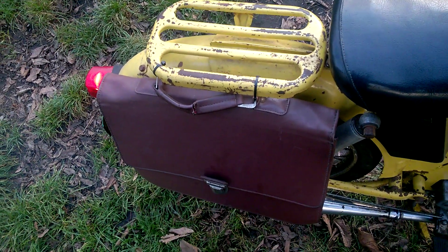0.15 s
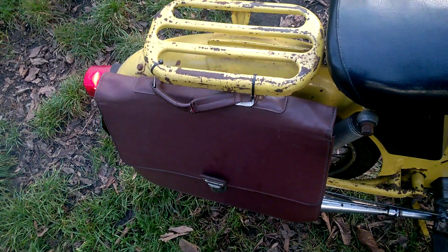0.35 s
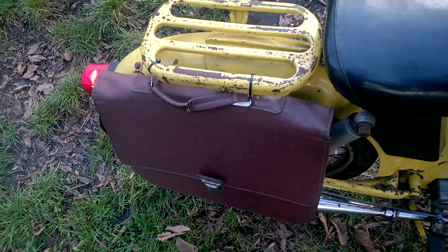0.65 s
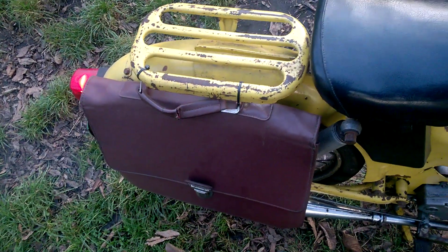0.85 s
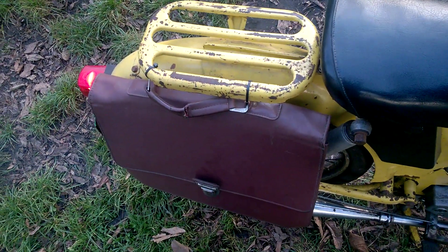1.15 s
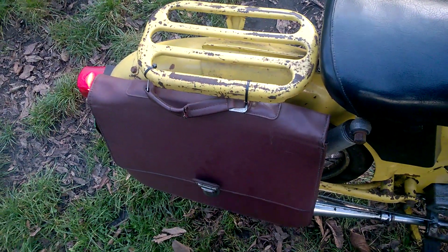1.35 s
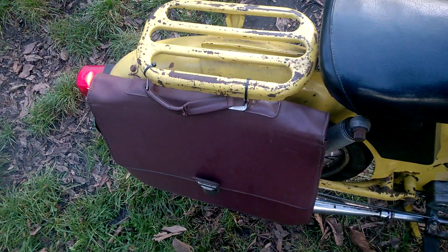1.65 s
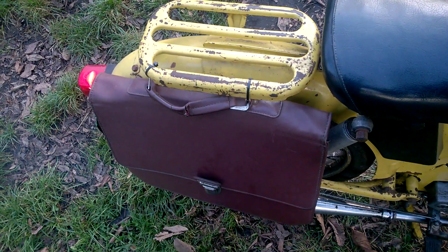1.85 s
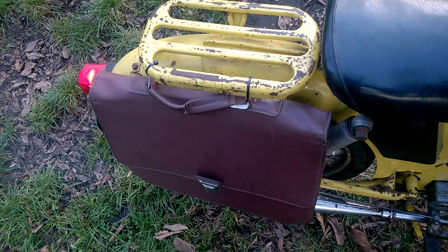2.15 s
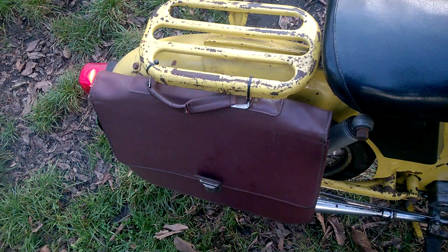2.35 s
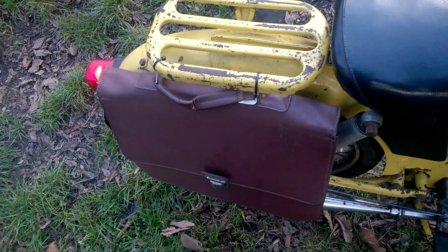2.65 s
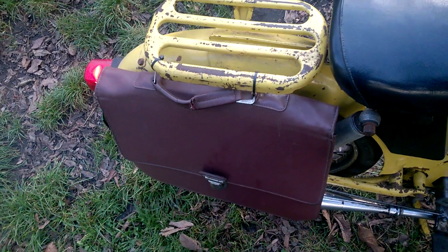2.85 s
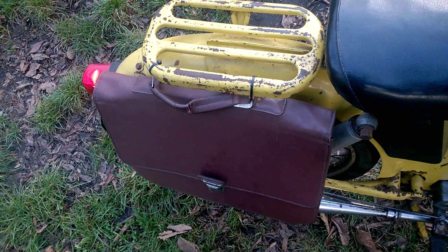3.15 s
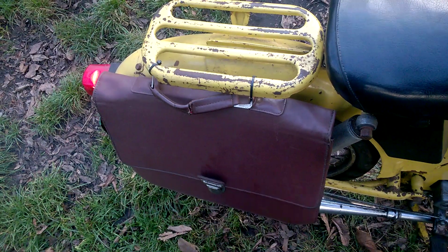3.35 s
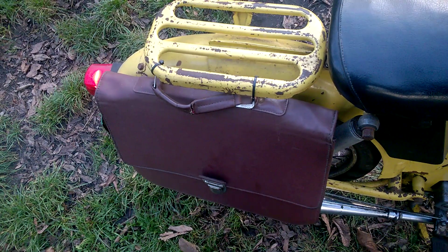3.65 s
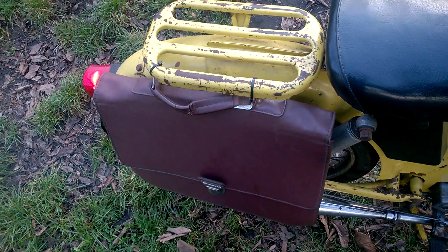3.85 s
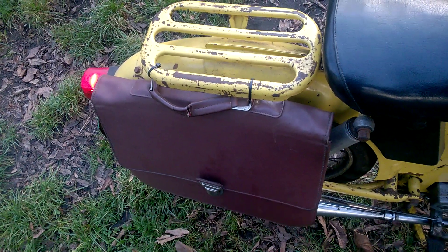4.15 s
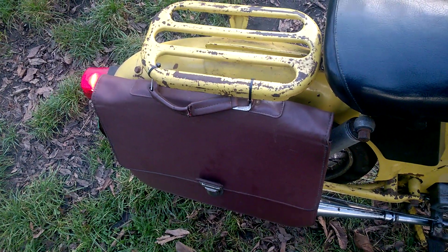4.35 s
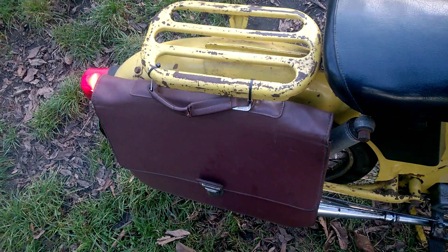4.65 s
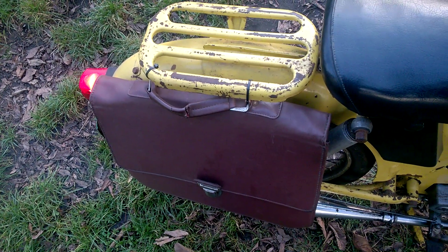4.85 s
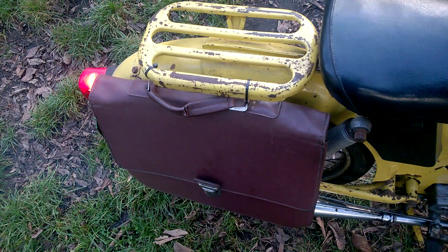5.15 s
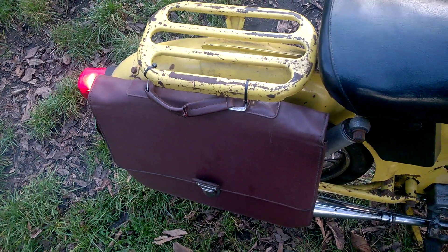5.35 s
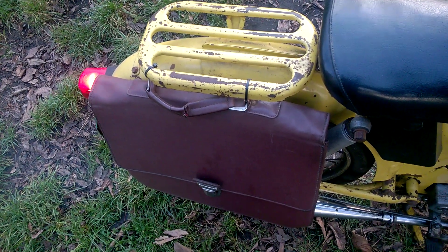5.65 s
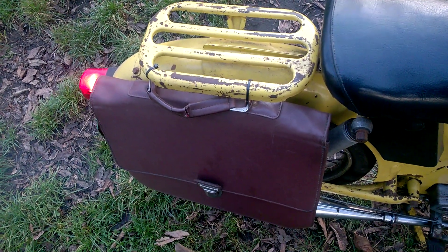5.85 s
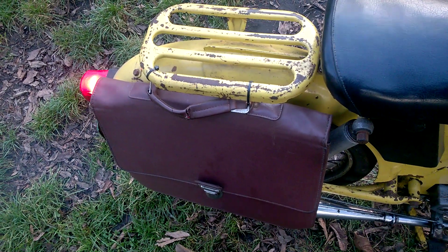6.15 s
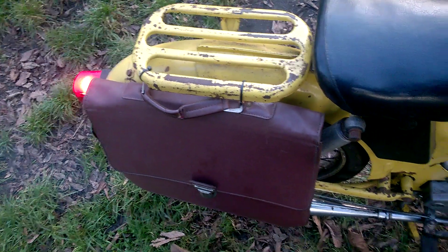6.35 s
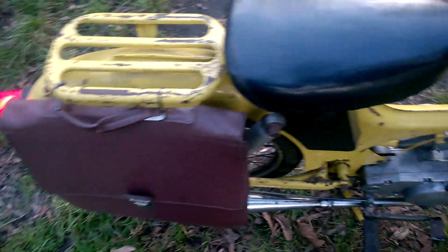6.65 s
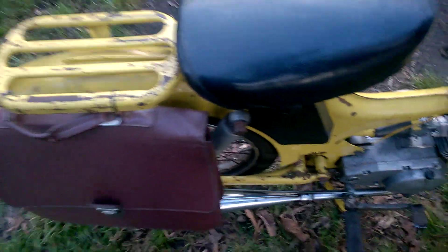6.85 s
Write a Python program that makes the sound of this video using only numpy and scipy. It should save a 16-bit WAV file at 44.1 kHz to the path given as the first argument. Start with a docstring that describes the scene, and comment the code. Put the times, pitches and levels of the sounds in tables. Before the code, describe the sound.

A small moped two-stroke idles close by in the open air: irregular bursts of two or three low pops with coasting putters between, over metallic ticking and chain rattle. At about four seconds the throttle opens, the gaps close into an even buzz and pitch climbs for over two seconds. Just after six and a half it is eased, faltering and rasping, as the microphone swings nearer the cylinder. Dry, no echo.

```python
"""A small two-stroke moped stutters at idle: bursts of one to three firings, coasting revolutions between.
From 4 s the throttle opens and every revolution fires; the speed climbs, with brief stutters near the top,
and the throttle is eased at 6.5 s. Gas pulses ring exhaust and air box, shaped noise makes the gas rush,
and knocks at set crank angles ring the cylinder fins and rasp."""
import sys
import numpy as np
from scipy import signal
from scipy.fft import rfft, irfft, next_fast_len
from scipy.io import wavfile
from scipy.ndimage import uniform_filter1d

SR = 44100
rng = np.random.default_rng(int(sys.argv[2]) if len(sys.argv) > 2 else 0)


def store_pcm(level_fs):
    """Save levels as 16-bit WAV."""
    pcm = np.round(np.clip(level_fs, -1, 1) * 32767).astype(np.int16)
    wavfile.write(sys.argv[1], SR, np.atleast_2d(pcm).T)


N = 308682
TIME = np.arange(N) / SR

# crankshaft speed before the kick of each burst: t/s, speed/(rev/s)
SPEED = [(0.0, 41.7), (0.62, 42.1), (0.8, 41.5), (1.15, 43.0), (3.16, 42.1), (3.68, 43.4), (3.84, 42.1),
         (4.05, 44.0), (4.15, 47.1), (4.25, 48.96), (4.45, 51.42), (4.7, 55.0), (4.9, 57.28), (5.15, 59.21),
         (5.45, 59.92), (5.66, 60.23), (5.74, 60.03), (5.85, 62.19), (6.1, 65.82), (6.35, 69.56),
         (6.52, 70.47), (6.62, 68.29), (6.8, 66.55), (7.0, 63.44)]
# bursts of firing at idle: t/s of first firing, firings/1, strength/dB
BURSTS = [(0.052, 2.0, 0.5), (0.218, 2.0, -0.5), (0.361, 3.0, -1.5), (0.548, 3.0, -1.4), (0.713, 3.0, -0.7),
          (0.879, 2.0, -1.0), (1.021, 3.0, -0.7), (1.162, 2.0, 0.0), (1.3, 3.0, -1.0), (1.509, 2.0, 1.0),
          (1.672, 3.0, 0.2), (1.856, 2.0, -0.5), (2.045, 2.0, -1.0), (2.139, 3.0, -2.4), (2.304, 3.0, 0.3),
          (2.468, 3.0, -1.5), (2.633, 3.0, -1.7), (2.797, 2.0, -0.4), (2.915, 3.0, -0.3), (3.08, 2.0, -1.2),
          (3.222, 1.0, -1.3), (3.27, 2.0, -4.5), (3.339, 3.0, -1.0), (3.526, 1.0, 0.4), (3.641, 3.0, -0.6),
          (3.804, 3.0, -0.4), (3.987, 3.0, 0.4), (4.121, 2.0, 0.6), (4.248, 2.0, 0.0)]
# noise colour of metal rasp: f/Hz, density/(dB per Hz), relative
CLATTER_SPECTRUM = [(1100, -3.5), (1300, -1), (1600, -11), (1850, -4), (2500, -9.5), (3100, -10.5),
                    (3550, -15.5), (4200, -12.5), (4600, -22.5), (5500, -26), (6200, -31.5), (7000, -38.5),
                    (7600, -55)]
# noise colour of fine hiss: f/Hz, density/(dB per Hz), relative
HISS_SPECTRUM = [(6000, -10), (7500, 0), (8200, 2), (9000, -4), (9700, -3), (10000, 4), (10400, -5),
                 (11000, 3), (11500, -4), (12150, 6), (12900, -4), (15700, -8)]
# noise colour of the opening exhaust port, also of knock thuds: f/Hz, density/(dB per Hz), relative
CRACK_SPECTRUM = [(300, -18), (520, 5.5), (750, 10), (1150, -6), (1450, -24.5), (2000, -19), (3000, -27.5),
                  (4200, -21.5), (6000, -38)]

# throttle opens and is held, then is eased, which takes a share of the load
OPEN_AT_S, OPENING_S = 4.07, 0.38
EASE_AT_S, EASING_S, EASE_SHARE = 6.51, 0.069, 0.26
STUTTER_EDGE_S = .024
# strokes grow harder with acceleration above the usual
PULL_DB_PER_REV_S2, USUAL_GAIN_REV_S2 = 0.1566, 6.8
# hotter gas raises the exhaust resonances; they sag when firing stops
HEAT_LAG_S, HEAT_SHIFT, USUAL_HEAT = 0.13, 0.04, 0.97
# tailpipe throb: level without load, gain at full load, extra near the muffler's own note
THROB_DB, THROB_LOAD_DB = -27, 5.5
BOOM_DB, BOOM_HZ, BOOM_WIDTH_HZ = 7.5, 66.3, 14.6
# muffler chamber: note, murmur at full load, boom per share of load lost
CHAMBER_HZ, CHAMBER_DB, CHAMBER_STUTTER_DB = 139.5, -36.5, -18.5
# gas raggedness under full load, as a share of an idle firing
LOADED_RAGGEDNESS = .42
# mechanical gains at idle speed, and rise per extra rev/s
IDLE_REV_S = 42.5
CLATTER_DB, CLATTER_RISE_DB = -39, 0.2385
HISS_DB, HISS_RISE_DB = -79, 0.5
# microphone swings towards the cylinder; the hiss is beamed, so it gains more
APPROACH_AT_S, APPROACH_S = 6.51, 0.27
APPROACH_DB, HISS_APPROACH_DB = 1.5, 5.5
SLAP_AT_S, SLAP_GROWTH_S, SLAP_ANGLE_TURNS, SLAP_DB = 5.7, 1.0, .2, -32
CUTOFF_HZ = 15700


def from_db(db):
    """Decibels to gain."""
    return 10 ** (np.asarray(db) / 20)


def rms_one(x):
    """Scale to unit power."""
    return x / np.sqrt(np.mean(x ** 2) + 1e-20)


def in_time(rows):
    """Each column of a curve, sample by sample."""
    s, *columns = np.transpose(rows)
    return [np.interp(TIME, s, c) for c in columns]


def ramp(start_s, length_s):
    """A steady move from 0 to 1."""
    return np.clip((TIME - start_s) / length_s, 0, 1)


def noise(spectrum):
    """Unit-power noise of a given colour, cut off outside its ends."""
    hz, db = np.transpose(spectrum)
    size = next_fast_len(N, real=True)
    log_hz = np.log(np.maximum(np.fft.rfftfreq(size, 1 / SR), 1))
    gain = from_db(np.interp(log_hz, np.log(hz), db, left=-200, right=-200))
    white = rng.standard_normal(size)
    return rms_one(irfft(rfft(white) * gain, size)[:N])


def clicks(at, sizes):
    """Impulses at the given samples."""
    return np.bincount(np.clip(at, 0, N - 1), sizes, N) + 1e-18


def ring(push, hz, width_hz):
    """Two-pole resonance: a unit click starts a decaying sine of height 1."""
    r, w = np.exp(-np.pi * width_hz / SR), 2 * np.pi * hz / SR
    return signal.lfilter([0, np.sin(w)], [1, -2 * r * np.cos(w), r * r], push)


def fade(push, decay_s, rise_s=0.0017):
    """Each click becomes an envelope that swells quickly and dies away."""
    r = np.exp(-1 / (rise_s * SR))
    swell = signal.lfilter([(1 - r) ** 2], [1, -2 * r, r * r], push)
    return signal.lfilter([1], [1, -np.exp(-1 / (decay_s * SR))], swell)


def scatter(count, spread_db):
    """Random gains: strokes differ in strength."""
    return from_db(spread_db * rng.standard_normal(size=512)[:count])


def crank(surge=.033, surge_s=.042, lag_s=.018):
    """Crank angle in turns: sags before each burst, is kicked on by it, and is whole when a burst begins."""
    starts = np.array(BURSTS)[:, 0]
    coarse = TIME[::50]
    since = (coarse[:, None] - starts - lag_s) / surge_s
    kick = np.interp(TIME, coarse, (since * np.exp(-since ** 2 / 2)).sum(1))
    turns = np.cumsum(in_time(SPEED)[0] * (1 + surge * kick)) / SR
    ahead = np.unwrap(np.interp(starts, TIME, turns), period=1)
    return turns - np.interp(TIME, starts, ahead)


def passing(turns, angle, jitter_s):
    """The sample at which each revolution passes a crank angle in turns."""
    revs = np.arange(np.ceil(turns[0]), np.floor(turns[-1]) + 1)
    jitter = jitter_s * rng.standard_normal(size=512)[:len(revs)]
    s = np.interp(revs + angle, turns, TIME) + jitter
    return np.clip(np.round(s * SR).astype(int), 0, N - 1)


def idle_burn(at, lead_in=0.6, trail=0.057):
    """Firing strength per revolution at idle; weak firings lead into each burst and another trails it."""
    burn = np.zeros(len(at))
    for s, firings, db in BURSTS:
        k = np.arange(len(at)) - np.argmin(abs(at / SR - s))
        n = round(firings)
        full = (k >= 0) & (k < n)
        shape = full + lead_in * ((k == -1) + .5 * (k == -2)) + trail * (k == n)
        burn = np.maximum(burn, from_db(db) * shape)
    return burn


def stutter():
    """Share of the load lost in each brief stutter, with sloped edges."""
    # t/s, length/s, share of load lost/1
    dropouts = [(5.67, .05, .45), (6.535, .075, .65), (6.69, .08, .65), (6.83, .065, .38), (6.985, .05, .5)]
    lost_share = 0
    for s, length_s, lost in dropouts:
        start_s = s - STUTTER_EDGE_S / 2
        gate = ramp(start_s, STUTTER_EDGE_S) - ramp(start_s + length_s, STUTTER_EDGE_S)
        lost_share = lost_share + lost * gate
    return lost_share


def gaining():
    """Smoothed acceleration of the crank in rev/s^2, never negative."""
    slope = np.gradient(in_time(SPEED)[0]) * SR
    return np.maximum(uniform_filter1d(slope, size=SR // 8), 0)


def engine_load():
    """Burning charge, 0-1: rises as the throttle opens, falls as it is eased and in each stutter."""
    eased = 1 - EASE_SHARE * ramp(EASE_AT_S, EASING_S)
    return np.clip(ramp(OPEN_AT_S, OPENING_S) * eased * (1 - stutter()), 0, 1)


def gas_tuning(at, burn, load):
    """Factor on the exhaust resonances: burning heats the gas with a lag, and heat raises them."""
    r = np.exp(-1 / (HEAT_LAG_S * SR))
    burning = np.interp(np.arange(N), at, np.maximum(burn, load))
    heat = signal.lfilter([1 - r], [1, -r], burning)
    return 1 + HEAT_SHIFT * (heat - USUAL_HEAT)


def pipe(modes, at, burn, spread_db, tuning=1, boom_power=0.73, mixture_db=0.92):
    """One gas pulse a revolution rings the resonances; its colour changes with the throttle."""
    opened, eased = ramp(OPEN_AT_S, OPENING_S)[at], ramp(EASE_AT_S, EASING_S)[at]
    coast, firing = np.clip(1 - burn, 0, 1), 1 - stutter()[at]
    pull = from_db(PULL_DB_PER_REV_S2 * (gaining()[at] - USUAL_GAIN_REV_S2))
    # the mixture varies, so runs of strokes grow stronger and weaker together
    mixture = from_db(mixture_db * noise([(3, 0.0078), (16, 0.019)])[at])
    # ring on a warped clock, faster as the tuning rises, then map back to time
    clock = np.cumsum(tuning * np.ones(N))
    pulse_at, size_out = clock[at].astype(int), int(clock[-1]) + 1
    out = 0
    for k, (hz, width_hz, coast_db, burst_db, load_db, eased_db) in enumerate(modes):
        # deep modes follow burn less steeply; a stutter robs the upper ones
        fired = burn ** (boom_power if hz < 180 else 1)
        idling = coast * from_db(coast_db) + fired * from_db(burst_db)
        running = (1 - eased) * from_db(load_db) + eased * from_db(eased_db)
        running = running * (firing if hz > 450 else 1)
        stroke = (1 - opened) * idling + opened * pull * running
        size = stroke * mixture * scatter(len(at), spread_db)
        push = np.bincount(pulse_at, size, size_out) + 1e-18
        out = out + (-1) ** k * ring(push, hz, width_hz)
    return np.interp(clock, np.arange(len(out)), out)


def throb_level(speed, load):
    """Throb in dB: swells with load, most near the muffler's own note."""
    in_tune = 1 / (1 + (2 * (speed - BOOM_HZ) / BOOM_WIDTH_HZ) ** 2)
    return THROB_DB + load * (THROB_LOAD_DB + BOOM_DB * in_tune)


def tailpipe(turns):
    """Pumped gas throbs once a revolution; the muffler chamber murmurs under load and booms in each stutter."""
    speed, load = in_time(SPEED)[0], engine_load()
    # at higher speeds the gas leaves the muffler later in the revolution
    delay_turns = np.interp(speed, [45, 52, 64, 70], [.02, .14, .22, .32])
    throb = from_db(throb_level(speed, load)) * np.sin(2 * np.pi * (turns - delay_turns))
    chamber = rms_one(ring(rng.standard_normal(N), CHAMBER_HZ, 22))
    murmur = from_db(CHAMBER_DB) * load * chamber
    boom = from_db(CHAMBER_STUTTER_DB) * stutter() * np.sin(2 * np.pi * CHAMBER_HZ * TIME)
    return np.sqrt(2) * (throb + boom) + murmur


def carburettor(inlet_at):
    """Air sucked past the closing throttle slide honks unevenly."""
    # throat resonances: f/Hz, width/Hz, level/dB
    throat_modes = [(685, 25, -29), (1190, 45, -28)]
    closed = ramp(EASE_AT_S, EASING_S)[inlet_at]
    out = 0
    for hz, width_hz, db in throat_modes:
        size = closed * from_db(db) * scatter(len(inlet_at), 3)
        out = out + ring(clicks(inlet_at, size), hz, width_hz)
    return out


def gas_rush(at, burn, load, puff_db=-24.5, steady_db=-43, coast_share=0.32):
    """Turbulence: a short port crack and a longer puff each stroke, raggedest at idle, over a steady rush."""
    # noise colour of the rush: f/Hz, density/(dB per Hz), relative
    gas_spectrum = [(40, -15.5), (90, -3.5), (250, -13), (400, -8.5), (700, -14), (1150, -13), (1450, -27),
                    (2500, -35.5)]
    raggedness = (coast_share + burn) * (1 - load) + LOADED_RAGGEDNESS * load
    blows = clicks(at, raggedness * scatter(len(at), .8))
    crack = from_db(-26) * fade(blows, decay_s=.0022, rise_s=.0004) * noise(CRACK_SPECTRUM)
    puffs = fade(blows, decay_s=.014)
    return crack + noise(gas_spectrum) * (from_db(puff_db) * puffs + from_db(steady_db))


def mechanical_levels():
    """Clatter and hiss gains in dB: both grow with speed and as the microphone comes closer."""
    extra_speed = in_time(SPEED)[0] - IDLE_REV_S
    closer = ramp(APPROACH_AT_S, APPROACH_S)
    return (CLATTER_DB + CLATTER_RISE_DB * extra_speed + APPROACH_DB * closer,
            HISS_DB + HISS_RISE_DB * extra_speed + HISS_APPROACH_DB * closer)


def fins(hits):
    """Cylinder fins and casings ring after each contact."""
    # resonances: f/Hz, width/Hz, relative level/dB
    fin_modes = [(1550, 50, -6), (1850, 80, -1), (2080, 65, 0), (2500, 90, -1), (3005, 55, -5),
                 (3260, 55, -10), (3915, 65, -13), (4215, 70, -8), (5360, 40, -20)]
    return sum((-1) ** k * from_db(db) * ring(hits, hz, width_hz)
               for k, (hz, width_hz, db) in enumerate(fin_modes))


def clatter(turns, burn, ring_db=-9.5, rasp_db=-2.5):
    """Piston, bearings and chain knock at set crank angles: fins ring, a short rasp and grainy sizzle follow."""
    # contacts per revolution: angle/turns, relative level/dB when coasting, in an idle burst, under load
    contacts = [(0.07, -1.5, 12.5, 3), (0.202, 7, 10, 5.5), (0.43, 10.5, 13.5, 8.5), (0.78, 8, 8.5, 6.5)]
    clatter_db, hiss_db = mechanical_levels()
    opened, hits = ramp(OPEN_AT_S, OPENING_S), 0
    for angle, coast_db, burst_db, load_db in contacts:
        at = passing(turns, angle, jitter_s=.00002)
        idle_db = coast_db + burn * (burst_db - coast_db)
        db = (1 - opened[at]) * idle_db + opened[at] * load_db
        hits = hits + clicks(at, from_db(db) * scatter(len(at), 1.7))
    rattle = rms_one(fade(hits, decay_s=.007, rise_s=.0002))
    sizzle = rms_one(fade(hits ** 2, decay_s=.004, rise_s=.0002))
    ringing = from_db(ring_db) * rms_one(fins(hits))
    rasp = from_db(rasp_db) * rattle * noise(CLATTER_SPECTRUM)
    hiss = from_db(hiss_db) * (.6 + .5 * sizzle) * noise(HISS_SPECTRUM)
    return from_db(clatter_db) * (ringing + rasp) + hiss


def piston_slap(turns):
    """Towards top speed and as the throttle is eased, the piston slaps the bore each turn: a dry, bright rasp."""
    # noise colour of the slap: f/Hz, density/(dB per Hz), relative
    slap_spectrum = [(1400, -7), (2500, 7.5), (3000, 2), (3600, -22), (5000, -3), (6000, -15.5),
                     (7300, -35.5)]
    at = passing(turns, SLAP_ANGLE_TURNS, jitter_s=.0002)
    growth = ramp(SLAP_AT_S, SLAP_GROWTH_S)[at]
    hits = clicks(at, growth * scatter(len(at), 1.5))
    return from_db(SLAP_DB) * fade(hits, decay_s=.0035, rise_s=.00015) * noise(slap_spectrum)


def knocks(level_db=5.5, bright_db=-31, thud_db=-3, ring_db=-5):
    """Loose metal knocks hard at listed times: noise bursts, and the fins ring."""
    # t/s, strength/dB before level_db
    knock_times = [(0.053, -36), (0.219, -35.5), (0.713, -41), (0.879, -39), (1.069, -45), (1.532, -40),
                   (1.672, -40), (1.695, -41), (2.046, -39), (2.351, -45), (2.492, -50), (2.657, -42),
                   (2.798, -40), (2.962, -47), (3.222, -41), (3.526, -40), (4.121, -36), (4.142, -39.5),
                   (5.928, -35)]
    s, db = np.transpose(knock_times)
    hits = clicks(np.round(s * SR).astype(int), from_db(db + level_db))
    envelope = fade(hits, decay_s=.008, rise_s=.0003)
    bright = from_db(bright_db) * noise(HISS_SPECTRUM)
    thud = from_db(thud_db) * noise(CRACK_SPECTRUM)
    return from_db(ring_db) * fins(hits) + envelope * (noise(CLATTER_SPECTRUM) + bright + thud)


def scene(inlet_angle=0.3802, muffler_hz=4500):
    """All the sounds of the engine hang on the one crankshaft."""
    # resonances: f/Hz (at unit tuning), width/Hz, then
    # level/dB when coasting, in an idle burst, under load, with the throttle eased
    exhaust_modes = [(83.5, 77, -40.5, -11, -52.5, -38), (157.7, 29.6, -39, -16, -20, -20),
                     (221, 64.6, -32, -30, -17.5, -19.5), (268.7, 43.6, -21, -33, -17.5, -21),
                     (356.3, 22.4, -54, -32, -27, -26.5), (390, 49, -35.5, -34, -26, -24.5),
                     (518.3, 21.5, -29, -33.5, -25.5, -29.5), (580, 99, -25, -35.5, -17, -19),
                     (670, 107, -23, -20, -16, -17), (767, 33.5, -36, -26.5, -22, -21.5),
                     (970, 80, -22, -36.5, -21.5, -24.5), (987, 110, -25.5, -24, -25.5, -38),
                     (1134, 91, -38.5, -40, -30, -32), (1557, 37, -45, -48, -38, -38),
                     (1830, 170, -48, -41.5, -40, -27), (2068, 150, -40, -43.5, -32.5, -43),
                     (2500, 140, -40.5, -44, -39.5, -35)]
    # air box, same columns
    intake_modes = [(175, 34.4, -19.5, -14.5, -41, -52), (356.3, 29.3, -23.5, -37, -44, -39)]
    turns = crank()
    at = passing(turns, 0, jitter_s=.00004)
    burn, load = idle_burn(at), engine_load()[at]
    exhaust = pipe(exhaust_modes, at, burn, spread_db=1.1, tuning=gas_tuning(at, burn, load))
    inlet_at = passing(turns, inlet_angle, jitter_s=.00006)
    intake = pipe(intake_modes, inlet_at, burn, spread_db=1.0) + carburettor(inlet_at)
    # the inlet sucks where the exhaust blows, so its pulse is negative; the muffler rounds the edges
    rounding = signal.butter(2, muffler_hz, fs=SR, output="sos")
    gas = signal.sosfilt(rounding, exhaust - intake + gas_rush(at, burn, load))
    return (gas + tailpipe(turns) + clatter(turns, burn) + piston_slap(turns) + knocks())[None]


def record(dry, low_hz=28):
    """The microphone loses the deepest bass; the top is cut."""
    thin = signal.sosfilt(signal.butter(2, low_hz, "high", fs=SR, output="sos"), dry)
    return signal.sosfilt(signal.ellip(10, .1, 80, CUTOFF_HZ, fs=SR, output="sos"), thin)


dry = scene()
out = record(dry)
store_pcm(out)
```